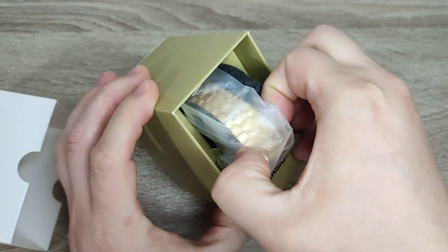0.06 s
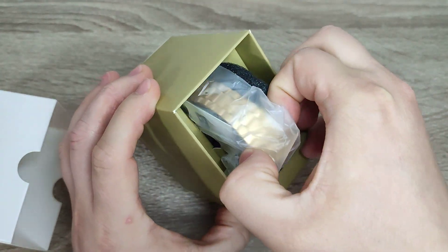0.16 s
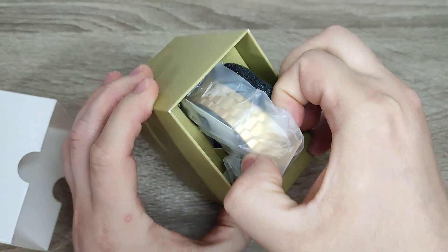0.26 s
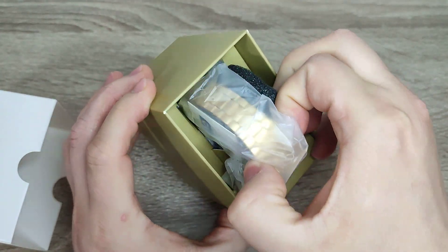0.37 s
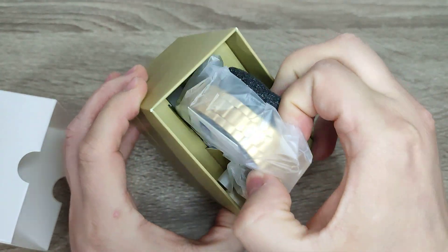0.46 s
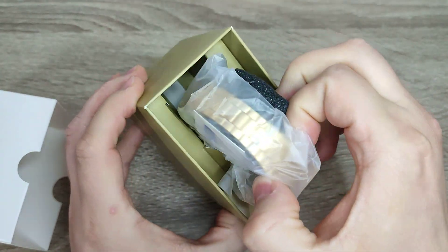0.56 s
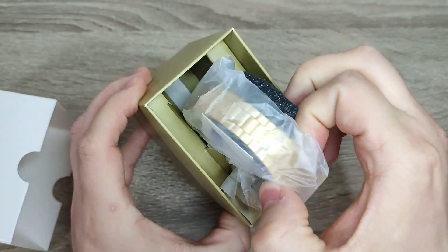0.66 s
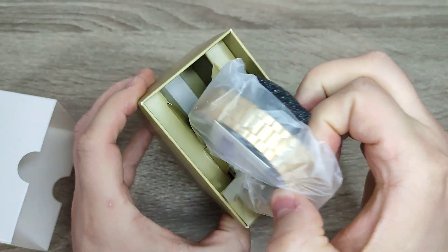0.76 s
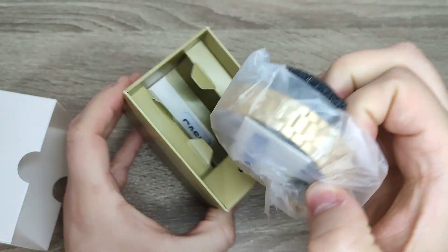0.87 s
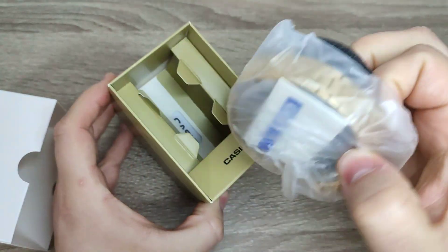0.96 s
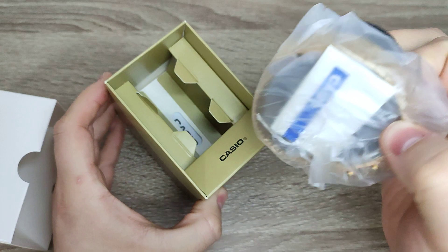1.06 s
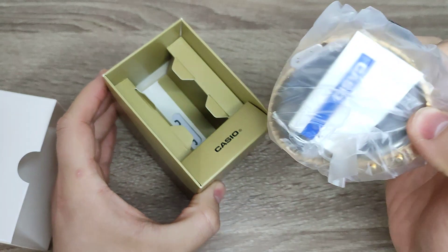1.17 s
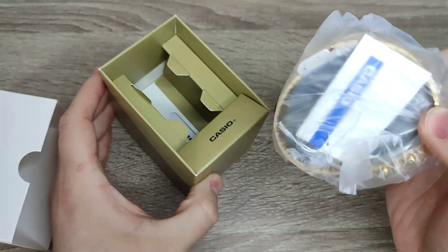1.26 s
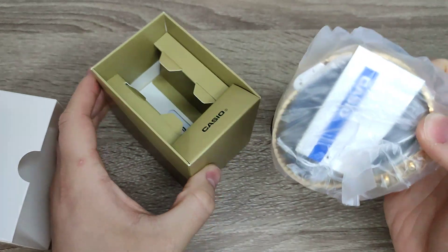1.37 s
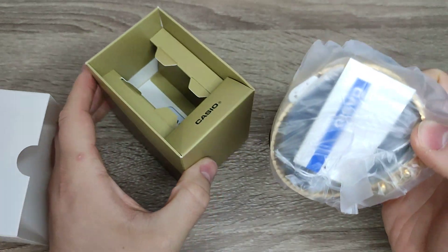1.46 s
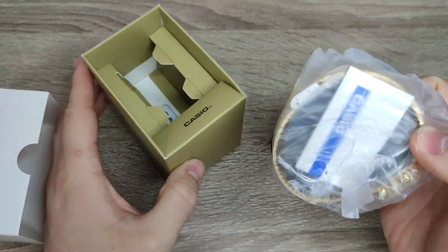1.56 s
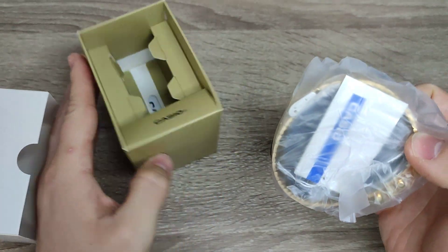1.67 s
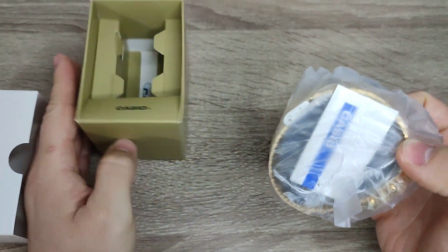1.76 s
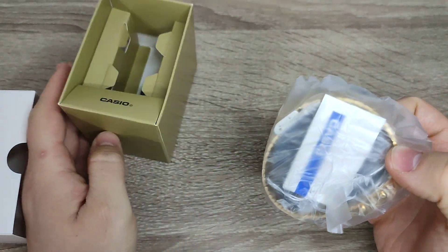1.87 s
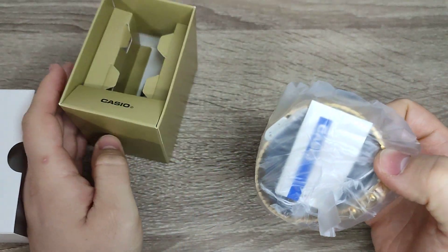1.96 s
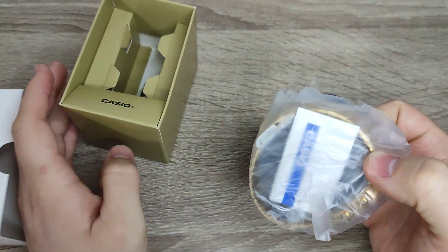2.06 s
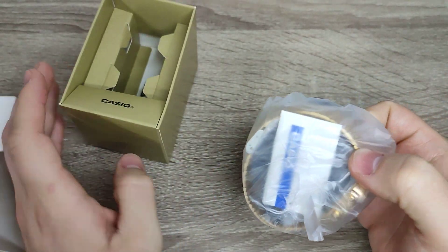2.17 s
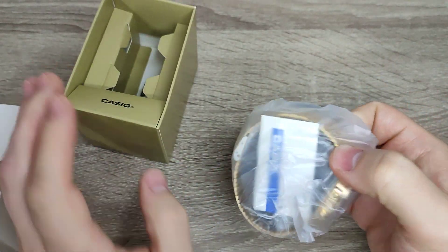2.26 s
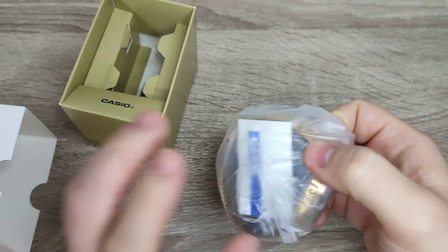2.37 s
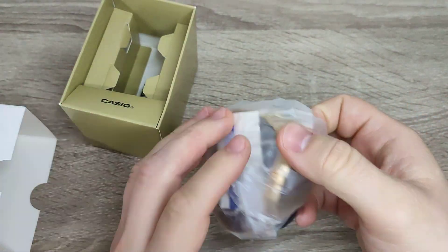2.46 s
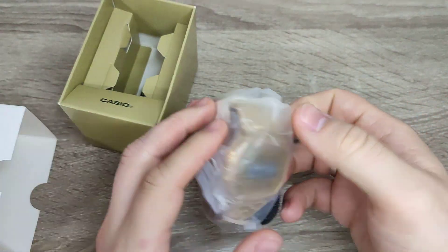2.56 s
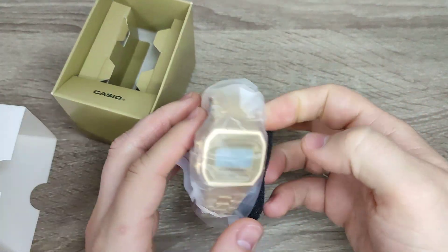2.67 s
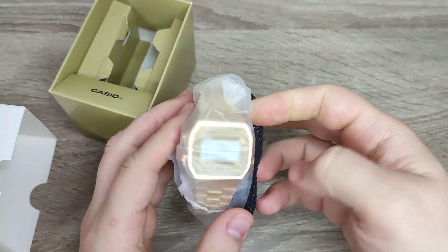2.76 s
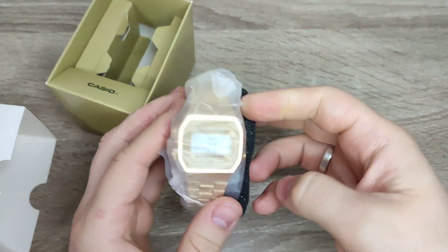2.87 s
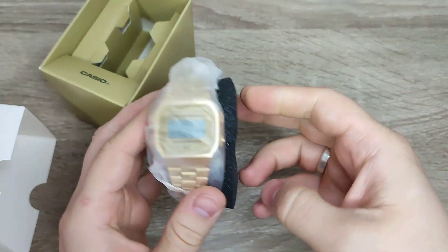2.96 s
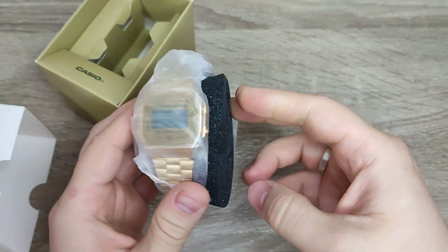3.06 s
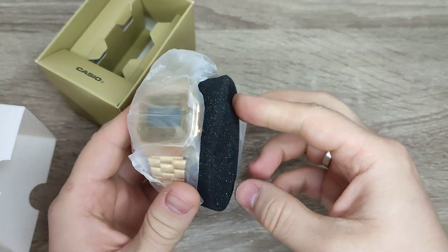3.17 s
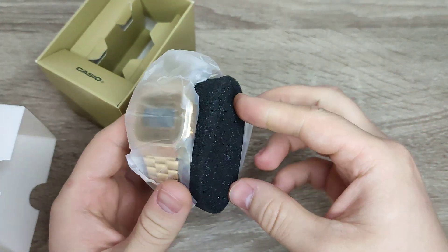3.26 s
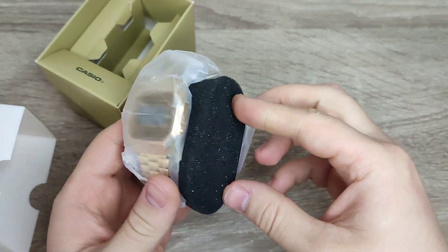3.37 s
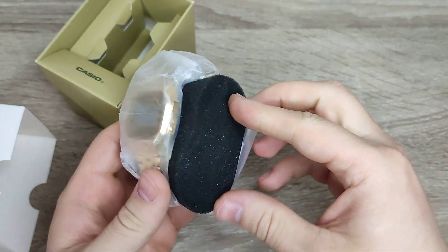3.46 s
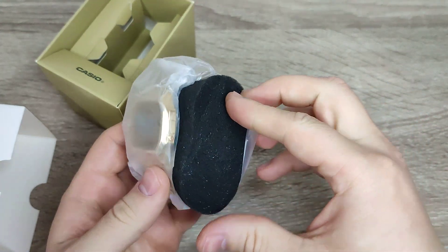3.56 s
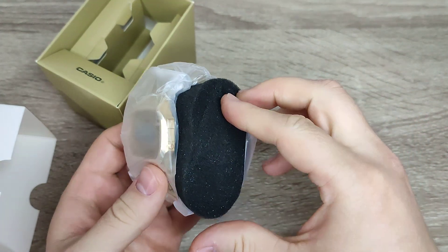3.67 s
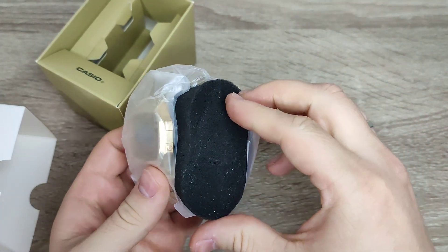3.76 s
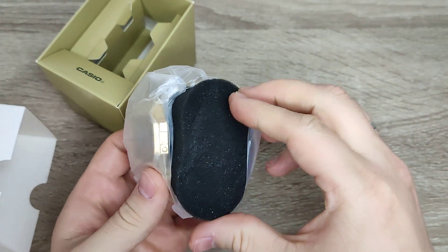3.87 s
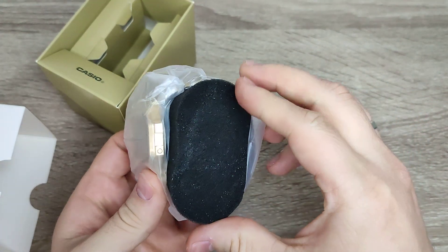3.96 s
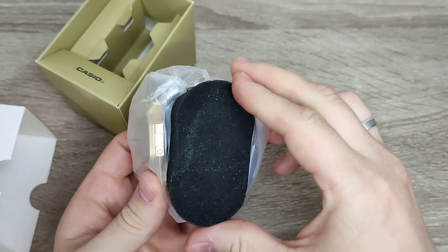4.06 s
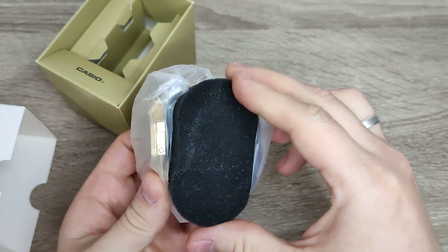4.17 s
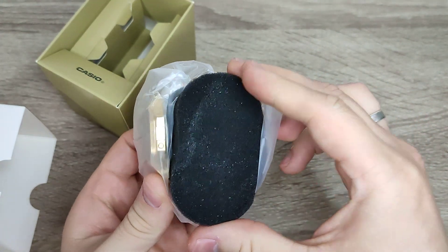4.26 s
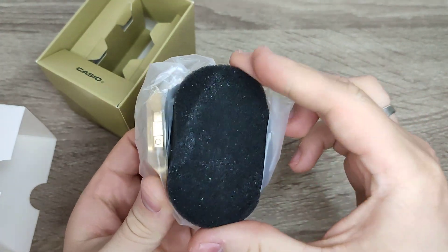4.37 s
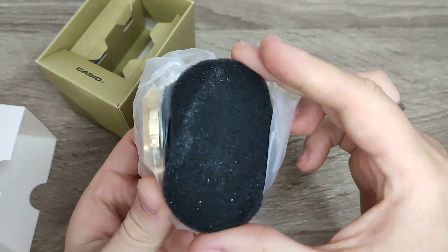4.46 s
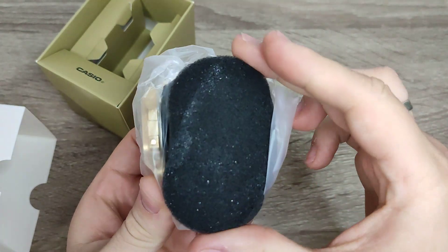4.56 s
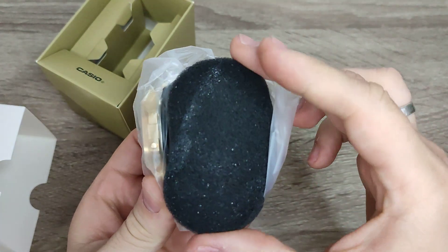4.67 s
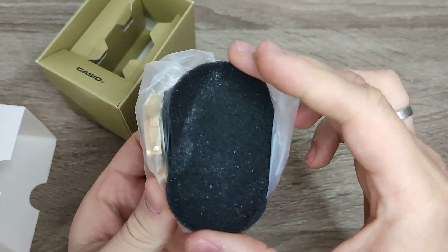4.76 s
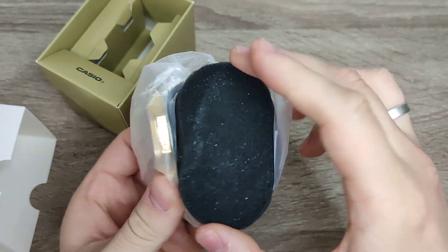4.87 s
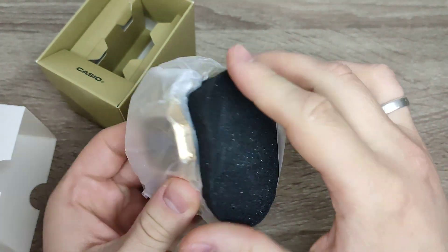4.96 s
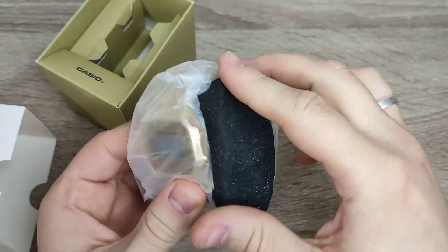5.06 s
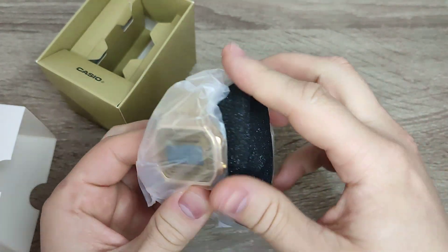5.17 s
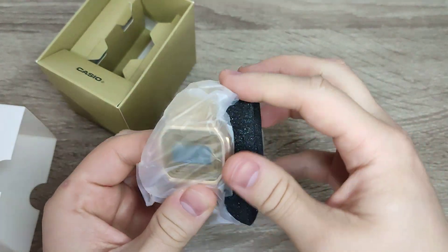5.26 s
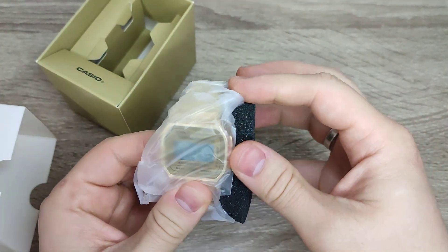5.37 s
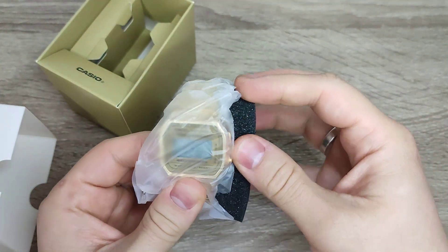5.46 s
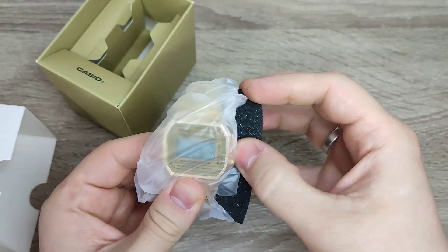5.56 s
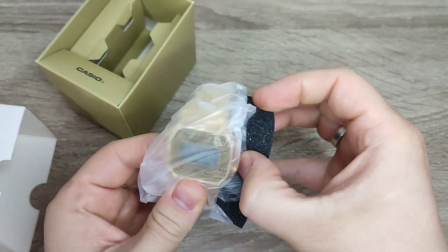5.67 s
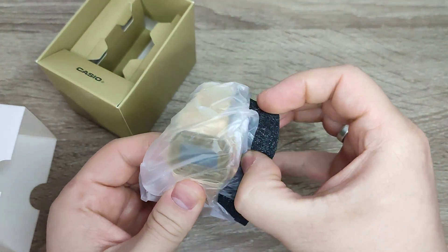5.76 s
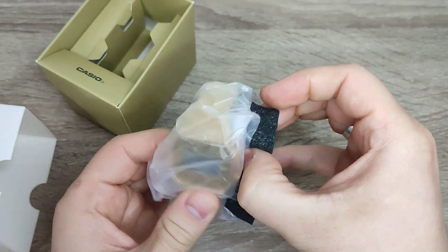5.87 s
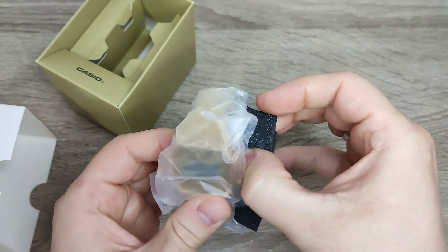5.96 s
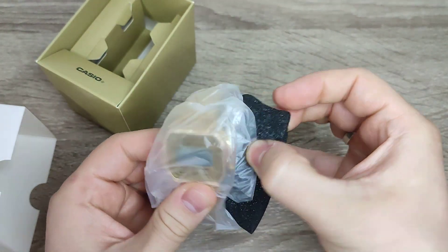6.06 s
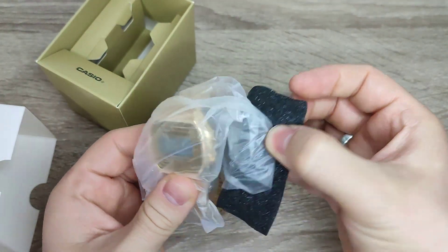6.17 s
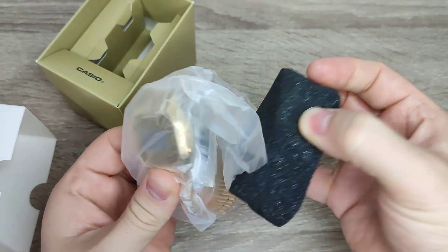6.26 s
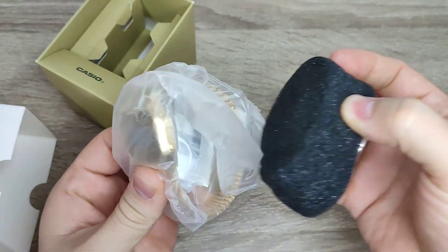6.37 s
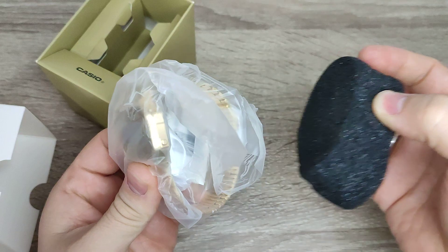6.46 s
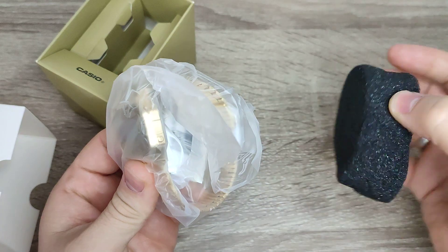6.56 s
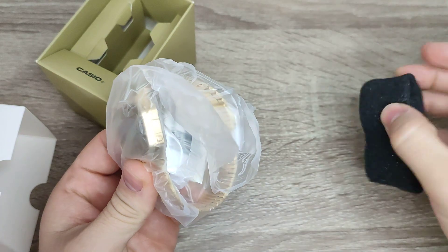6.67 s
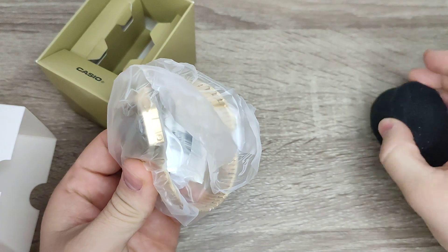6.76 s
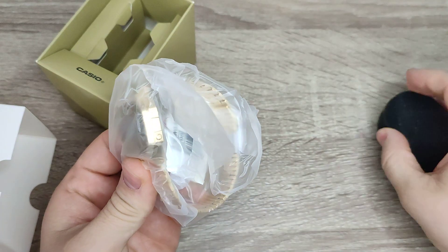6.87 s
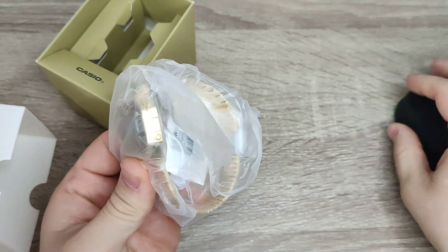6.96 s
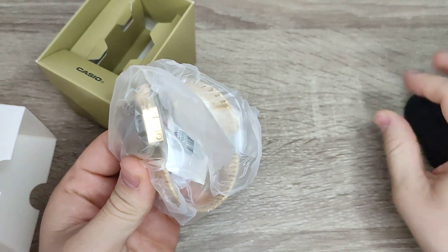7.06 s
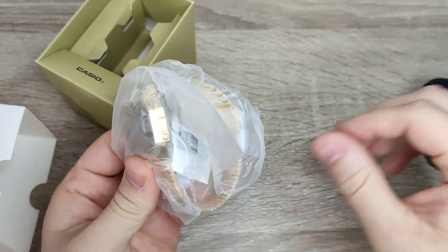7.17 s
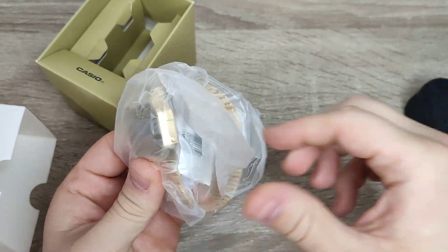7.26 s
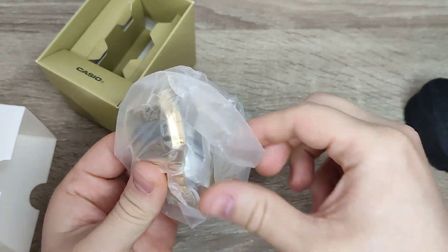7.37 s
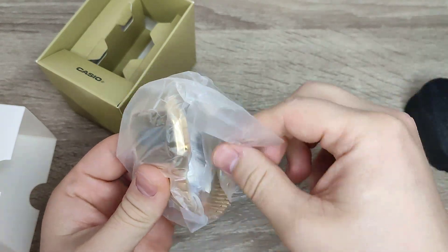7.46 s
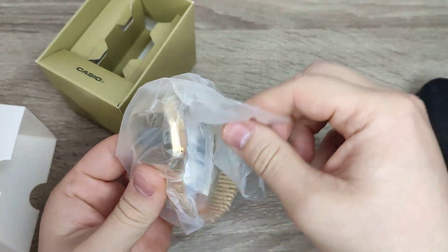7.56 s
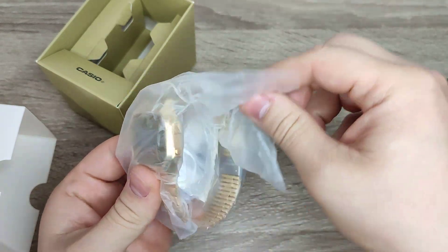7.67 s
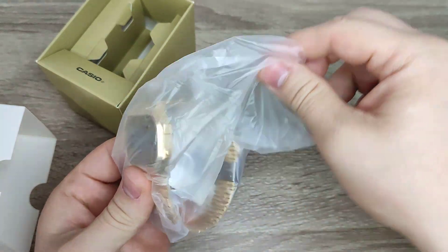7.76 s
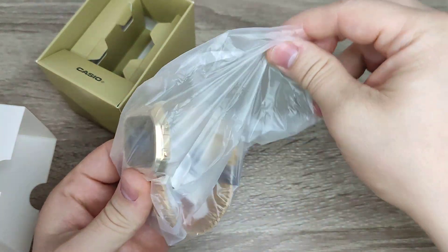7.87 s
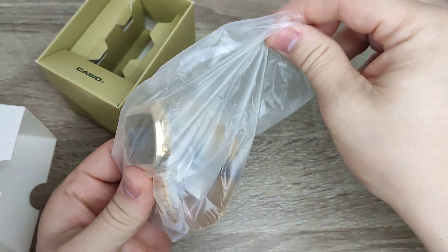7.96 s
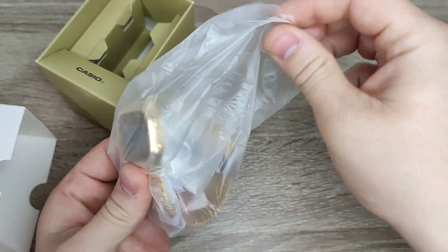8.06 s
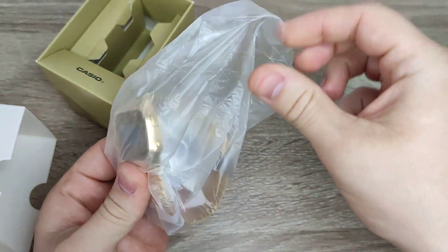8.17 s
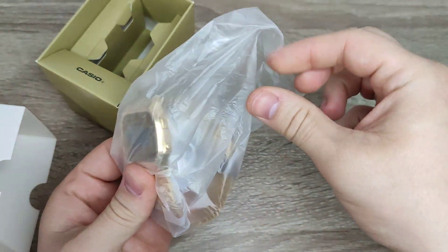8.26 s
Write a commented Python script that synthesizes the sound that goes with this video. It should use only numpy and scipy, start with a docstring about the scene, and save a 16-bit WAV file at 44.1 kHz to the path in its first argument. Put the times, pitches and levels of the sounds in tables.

```python
"""Thin plastic film rubs, crackles and snaps close by, over the faint hum of an appliance in a quiet room.
A wristwatch in a bag is pulled out of a small cardboard box, whose insert snaps back; the box is set down
and pushed aside on a wooden table; a foam cushion is worked out of the strap and the bag is drawn open.
Film, card and wood are noise gated by tiny slips and coloured by spectra, snaps are short noise bursts,
and the box and its insert ring as damped modes."""
import sys
import numpy as np
from scipy import signal
from scipy.fft import rfft, irfft, next_fast_len
from scipy.io import wavfile
from scipy.ndimage import map_coordinates

SR = 44100
rng = np.random.default_rng(int(sys.argv[2]) if len(sys.argv) > 2 else 0)


def master_out(mix):
    """Clip the mix to full scale and print it as 16-bit PCM to the path in sys.argv[1]."""
    frames = np.transpose(np.atleast_2d(mix))
    ceiling = np.clip(frames, -1, 1)
    pcm = np.round(ceiling * 32767).astype(np.int16)
    wavfile.write(sys.argv[1], SR, pcm)


N = 366912

# Hiss of bare film. Each row: frequency in Hz, relative level in dB per Hz.
FILM_SPECTRUM = [(300, -19.5), (1200, -11.5), (2500, -9.5), (3700, -3.5), (5500, -1.5), (7200, 4),
                 (8500, -1), (10000, -5.5), (12000, -3), (14000, -5.5)]
# Lower tone of film backed by foam. Each row: frequency in Hz, relative level in dB per Hz.
BODY_SPECTRUM = [(150, -31), (400, -9), (580, -15), (800, -9.5), (1050, -3.5), (1350, -1), (1600, -6),
                 (1950, -1), (2500, -4.5), (4000, -8.5), (9000, -56)]
TOP_HZ = 14400  # upper band limit
ORDINARY_RUB_DB = -52  # film level that slip rate and small snaps are scaled against


def amp(db):
    """Decibels to gain."""
    return 10 ** (np.asarray(db) / 20)


def unit(x):
    """Scale to rms 1."""
    return x / np.sqrt(np.mean(x ** 2) + 1e-20)


def along(points, hz):
    """Read (Hz, value) points on a log frequency axis."""
    f, v = np.transpose(points)
    return np.interp(np.log(hz + 1), np.log(f + 1), v)


def wobble(rate):
    """A smooth random curve with this many knots a second."""
    knots = rng.standard_normal(int(N * rate / SR) + 4)
    return map_coordinates(knots, [np.arange(N) * rate / SR])


def fade(t, t60):
    """A decay of 60 dB in t60 seconds."""
    return np.exp(-np.log(1000) * t / t60)


def add(track, s, sound):
    """Mix a sound into a track at time s in seconds."""
    start = max(round(s * SR), 0)
    part = track[..., start:start + sound.shape[-1]]
    part += sound[..., :part.shape[-1]]


def filtered(x, response):
    """Multiply the spectrum of x by a complex response of frequency."""
    m = next_fast_len(N + SR // 2)
    return irfft(rfft(x, m) * response(np.fft.rfftfreq(m, 1 / SR)), m)[..., :N]


def coloured(x, spectrum, size=2048):
    """Pass x through a minimum-phase filter of unit energy with this spectrum."""
    cepstrum = irfft(np.log(amp(along(spectrum, np.fft.rfftfreq(size, 1 / SR)))))
    # folding the cepstrum forward makes the filter causal
    cepstrum[1:size // 2] *= 2
    cepstrum[size // 2 + 1:] = 0
    kernel = irfft(np.exp(rfft(cepstrum)))
    return signal.fftconvolve(x, kernel[None] / np.linalg.norm(kernel), axes=1)[:, :N]


def stereo(pair):
    """Two unrelated signals become left and right, alike in the bass and wide in the treble."""
    # Likeness of the channels. Each row: frequency in Hz, left-right correlation from 0 to 1.
    likeness = [(100, 0.86), (500, 0.73), (1200, 0.88), (2500, 0.38), (7000, 0.11), (14000, 0.088)]

    def mid_side_gains(hz):
        turn = np.arccos(np.clip(along(likeness, hz), -1, 1)) / 2
        return np.array([np.cos(turn), np.sin(turn)])

    mid, side = filtered(pair, mid_side_gains)
    return np.array([mid + side, mid - side])


def burst(t, rise, t60):
    """Two channels of noise that jump up and die away."""
    return rng.standard_normal((2, len(t))) * (1 - np.exp(-t / rise)) * fade(t, t60)


def ring(modes, t):
    """Sum damped modes, each struck with a new strength and polarity every time."""
    total = np.zeros(len(t))
    for hz, db, t60 in modes:
        strength = amp(db + rng.normal(0, 0.8)) * rng.choice([-1, 1])
        total += strength * np.sin(2 * np.pi * hz * t) * fade(t, t60)
    return total


def slips(rate, spread_db, t60):
    """Power envelope, mean about 1, of tiny slips at random moments: many weak, few strong."""
    sizes = amp(spread_db * np.minimum(rng.standard_exponential(N), 2.5)) ** 2
    happens = rng.random(N) < rate / SR
    power = happens * sizes / np.mean(sizes) * SR / rate
    life = fade(np.arange(SR // 20) / SR, t60) ** 2
    life = np.convolve(life, np.hanning(SR // 1000))  # soften each onset over 1 ms
    return np.abs(signal.fftconvolve(power, life / np.sum(life))[:N])


def grains(power, smooth=0.13):
    """Noise that comes in crackles over a little plain sliding."""
    share = np.clip(smooth, 0, 1)
    return np.sqrt(share + (1 - share) * power) * rng.standard_normal((2, N))


def gesture(rows):
    """Power of one long movement, silent before and after."""
    s, db = np.transpose(rows)
    return amp(np.interp(np.arange(N) / SR, s, db, left=-np.inf, right=-np.inf)) ** 2


def strokes(rows, attack, release):
    """Power of short movements (start, length, dB): each rises, holds and dies away."""
    power, t = np.zeros(N), np.arange(SR) / SR
    for s, length, db in rows:
        rise = np.minimum(t / attack, 1)
        decay = fade(np.maximum(t - length, 0), release)
        add(power, s, (amp(db) * rise * decay) ** 2)
    return power


def background(air_db=-59):
    """A distant motor hums as slightly unsteady partials over the room air, a shaped noise."""
    # Partials of the motor. Each row: frequency in Hz, average rms level in dB.
    hum_partials = [(37.7, -66.5), (75.4, -70), (102.3, -93), (150.7, -68.5), (226.1, -69.5)]
    # Tone of the room air. Each row: frequency in Hz, relative level in dB per Hz.
    air_spectrum = [(12, -54.5), (20, 5), (54, 3), (115, -2.5), (229, 3.5), (302, 1), (357, -10.5),
                    (774, -14.5), (841, -43), (994, -22), (3180, -26), (6910, -24.5), (9900, -62),
                    (13800, -25), (15000, -47)]
    t = np.arange(N) / SR
    hum = np.zeros(N)
    for hz, db in hum_partials:
        level = amp(db + wobble(4.7))
        hum += level * np.sin(2 * np.pi * hz * t + 0.45 * wobble(2.08))
    air = unit(filtered(rng.standard_normal((2, N)), lambda hz: amp(along(air_spectrum, hz))))
    return np.sqrt(2) * hum + amp(air_db) * stereo(air)


def room(x):
    """Each frequency of the room's answer, a tail of noise 5 ms behind, dies at its own speed."""
    # Reverberation. Each row: frequency in Hz, time to die by 60 dB in seconds.
    room_decay = [(200, 0.26), (1500, 0.29), (6000, 0.16), (14000, 0.05)]
    hz, t, z = signal.stft(rng.standard_normal((2, SR // 2)), SR, nperseg=256)
    tail = signal.istft(z * fade(t, along(room_decay, hz)[:, None]), SR, nperseg=256)[1]
    delayed = np.pad(x, ((0, 0), (SR // 200, 0)))
    return signal.fftconvolve(delayed, tail / np.linalg.norm(tail[0]), axes=1)[:, :N]


def sliding():
    """The box swishes over the wood with each push, a grainy friction noise."""
    # Pushes over the table. Each row: start in seconds, length in seconds, level in dB.
    push_moves = [(1.41, 0.038, -65), (1.635, 0.25, -60.5), (1.95, 0.069, -65), (2.1, .19, -63)]
    # Tone of the box on wood. Each row: frequency in Hz, relative level in dB per Hz.
    wood_spectrum = [(200, -11), (500, -4), (850, -4.5), (1130, 3.5), (1450, -10), (2300, -10), (5000, -24),
                     (10000, -25)]
    push = np.sqrt(strokes(push_moves, attack=.025, release=.25))
    grit = grains(slips(1100, spread_db=6, t60=.036))
    return coloured(push * grit, wood_spectrum)


def box(ring_db=-4.0, puff_db=-4):
    """The box, let go by the insert or touching the table, thumps or knocks: damped modes and a puff of noise."""
    # Knocks of the box: the insert letting go, then touches on the table.
    # Each row: start in seconds, base thump in dB, wall knock in dB before trims.
    box_knocks = [(0.904, -63, -38.5), (1.422, -38, -49), (1.457, -57, -46.5), (2.2947, -59, -33.5),
                  (2.299, -65, -44)]
    # Modes of the base. Each row: frequency in Hz, relative level in dB, time to die by 60 dB in seconds.
    base_modes = [(144.5, 0, 0.23), (268, -8, 0.11), (330, -2, 0.047)]
    # Modes of the walls. Each row: frequency in Hz, relative level in dB, time to die by 60 dB in seconds.
    wall_modes = [(335, -2.5, 0.034), (420, -4.5, 0.095), (562, -11, 0.045), (741, -7.5, 0.091),
                  (800, 2.5, 0.035), (1000, -23, 0.06)]
    # Tone of the air in the knocked box. Each row: frequency in Hz, relative level in dB per Hz.
    hollow_spectrum = [(120, -15), (340, 0), (560, -3.5), (790, 1.5), (1100, -15), (3000, -42)]
    knocks, puffs, t = np.zeros((2, N)), np.zeros((2, N)), np.arange(SR // 3) / SR
    for s, thump_db, wall_db in box_knocks:
        thump = amp(thump_db) * ring(base_modes, t)
        knock = amp(wall_db + ring_db) * ring(wall_modes, t)
        add(knocks, s, (thump + knock) * (1 - np.exp(-t / 0.00072)))
        add(puffs, s, amp(wall_db + puff_db) * burst(t, rise=.0005, t60=0.048))
    return knocks + stereo(coloured(puffs, hollow_spectrum))


def insert(ring_db=-27, crack_db=-15):
    """The cardboard insert lets go of the watch, slaps back as noise and shivers to rest in damped modes."""
    # Modes of the insert. Each row: frequency in Hz, relative level in dB, time to die by 60 dB in seconds.
    insert_modes = [(222, -17, 0.072), (330, -23, 0.076), (571, -11.5, 0.12), (978, 1, 0.038),
                    (1190, 0.5, 0.024), (1750, 5, 0.046), (1910, -12, 0.033), (3050, 5, 0.06)]
    # Tone of the slap. Each row: frequency in Hz, relative level in dB per Hz.
    slap_spectrum = [(150, -6.5), (300, 7.5), (500, -12), (1000, 5), (1800, -2), (2400, -2), (3100, 1),
                     (4200, -0.5), (7500, 2.5), (10500, -10), (14000, -1)]
    release_s = .9005
    slap, t = np.zeros((2, N)), np.arange(SR // 4) / SR
    hit = burst(t, rise=0.00017, t60=0.033) + amp(-11) * burst(t, rise=0.0041, t60=0.076)
    add(slap, release_s, amp(crack_db) * hit)
    slap = stereo(coloured(slap, slap_spectrum))
    add(slap, release_s, amp(ring_db) * ring(insert_modes, t))
    return slap


def flapping():
    """Pulled open, the whole sheet buckles with low, soft pops: dense slips of dark noise."""
    # Flapping of the stretched bag. Each row: time in seconds, level in dB.
    flap_level = [(7.4, -73.5), (7.53, -54), (7.6, -68), (7.75, -55), (7.86, -48.5), (7.93, -47),
                  (8.02, -62), (8.12, -62)]
    # Tone of the whole sheet. Each row: frequency in Hz, relative level in dB per Hz.
    sheet_spectrum = [(80, -31), (200, -10), (350, -0.5), (600, -13), (780, -2.5), (1200, -14.5),
                      (4000, -40)]
    s, db = np.transpose(flap_level)
    level_db = np.interp(np.arange(N) / SR, s, db)
    pops = np.sqrt(slips(np.full(N, 120), spread_db=1, t60=0.023)) * rng.standard_normal((2, N))
    return coloured(amp(level_db) * pops, sheet_spectrum)


def handling():
    """Power of the film's hiss and of its rub on foam and on cardboard, from all movements of the hands."""
    # Drawing the watch out of the cardboard. Each row: time in seconds, rub level in dB.
    pull_out = [(0, -49.5), (0.05, -47.5), (0.13, -55), (0.3, -52), (0.41, -56), (0.46, -48), (0.59, -45),
                (0.77, -53), (0.83, -48.5), (0.89, -37), (0.93, -54), (1.04, -62.5)]
    # Turning the foam cushion in the strap. Each row: time in seconds, rub level in dB.
    turn_cushion = [(3.51, -64.5), (3.59, -51), (3.71, -44.5), (3.83, -57), (3.98, -52.5), (4.15, -65),
                    (4.27, -52.5), (4.43, -55), (4.55, -65.5)]
    # Working the cushion free. Each row: time in seconds, rub level in dB.
    free_cushion = [(4.83, -61.5), (4.9, -52.5), (5.01, -44.5), (5.15, -40), (5.17, -49.5), (5.38, -37),
                    (5.49, -45.5), (5.68, -43.5), (5.76, -42.5), (5.9, -47), (5.94, -38.5), (6.03, -50.5),
                    (6.11, -36.5), (6.28, -42), (6.32, -44.5), (6.49, -49.5), (6.51, -62), (6.62, -72)]
    # Drawing the bag open. Each row: time in seconds, rub level in dB.
    open_bag = [(7.34, -77), (7.38, -43.5), (7.45, -50.5), (7.65, -41), (7.74, -39.5), (7.84, -31),
                (8.02, -39.0), (8.04, -44), (8.15, -39.5), (8.2, -53.5), (8.32, -54)]
    # Short rubs of the film apart from the long movements, most of them single finger strokes. Each row: start
    # in seconds, length in seconds, film hiss in dB, low rub in dB.
    short_strokes = np.array([(0.83, 0.043, -40.5, -46), (1.038, 0.052, -55, -67),
                               (1.197, 0.098, -62.5, -70), (1.305, 0.024, -60, -61),
                               (1.382, 0.076, -57.5, -59), (1.62, 0.27, -69, -76),
                               (2.25, 0.099, -62.5, -67), (2.486, 0.2, -54, -60),
                               (2.537, 0.042, -46.5, -49.5), (2.748, 0.053, -50.5, -60.5),
                               (2.86, 0.035, -50.5, -60), (2.92, 0.17, -60, -65),
                               (3.159, 0.027, -53.5, -62), (3.236, 0.02, -58, -65),
                               (3.327, 0.031, -42.5, -49), (3.76, 0.0356, -44, -55),
                               (4.33, 0.067, -47.5, -55), (4.572, 0.11, -59.5, -66.5),
                               (4.694, 0.1, -53.5, -55.5), (5.112, 0.048, -39.5, -43.5),
                               (5.938, 0.058, -37.5, -50), (6.09, 0.14, -42, -45), (6.45, 0.042, -52, -48),
                               (6.66, 0.039, -59, -70), (6.789, 0.052, -56, -76), (6.886, 0.12, -60, -72),
                               (7.034, 0.053, -47, -60), (7.104, 0.11, -60, -81),
                               (7.374, 0.045, -47.5, -51)])
    attack, release = .012, 0.14  # rise time in seconds; seconds to die by 60 dB
    foam_under_db, bare_under_db, card_under_db = -8, -9.5, 0.5  # low rub on foam, bare watch, card
    holding_db = -76  # the film is never quite still in the hand

    pull = gesture(pull_out)
    cushion = gesture(turn_cushion) + gesture(free_cushion)
    bag = gesture(open_bag)
    stroke_film = strokes(short_strokes[:, [0, 1, 2]], attack, release)
    stroke_foam = strokes(short_strokes[:, [0, 1, 3]], attack, release)
    film = np.maximum(pull + cushion + bag, stroke_film) + amp(holding_db) ** 2
    low_rub = amp(foam_under_db) ** 2 * cushion + amp(bare_under_db) ** 2 * bag
    foam = np.maximum(low_rub, stroke_foam) + amp(holding_db) ** 2
    return film, foam, amp(card_under_db) ** 2 * pull


def patchy(x, depth_db, width_hz, size=512):
    """The creases keep changing shape: resonances come and go across the spectrum."""
    z = signal.stft(x, nperseg=size)[2]
    rows, frames = z.shape[1:]
    place = np.arange(rows) * SR / size / max(width_hz, 100)
    grid = np.meshgrid(place, np.arange(frames) / 2, indexing="ij")
    field = map_coordinates(rng.standard_normal((rows, frames)), grid, order=1)
    return signal.istft(z * unit(amp(depth_db * field)), nperseg=size)[1][:, :N]


def rubbing(film_power, foam_power, card_power, hiss_db=0.04, foam_db=0.32, grip_db=1.5):
    """The film sticks and slips; harder rubbing packs single ticks into a hiss."""
    # Tone of rubbed cardboard. Each row: frequency in Hz, relative level in dB per Hz.
    card_spectrum = [(150, -18), (320, -10.5), (620, -11), (970, 0), (1250, -5.5), (1770, 0), (2130, -3.5),
                     (2850, -0.5), (4300, -5.5), (9000, -15)]
    slips_per_s, slip_growth = 330, 1  # rate at an ordinary rub; how it follows the rubbing
    effort = np.sqrt(film_power) / amp(ORDINARY_RUB_DB)
    rate = np.clip(slips_per_s * effort ** slip_growth, 90, 4000)
    crackle = slips(rate, spread_db=6.5, t60=.014)
    drag = (crackle + slips(rate * .6, spread_db=6, t60=.018)) / 2
    grip = amp(grip_db * wobble(40))  # the fingers keep catching
    film = amp(hiss_db) * np.sqrt(film_power) * grip * grains(crackle, smooth=.13)
    foam = amp(foam_db) * np.sqrt(foam_power) * grip * grains(drag, smooth=.15)
    card = np.sqrt(card_power) * grains(slips(1100, spread_db=4.5, t60=0.034))
    hiss = coloured(patchy(film, depth_db=3.5, width_hz=679), FILM_SPECTRUM)
    low_rub = coloured(patchy(foam, depth_db=5, width_hz=213.0), BODY_SPECTRUM)
    return hiss + low_rub + coloured(card, card_spectrum)


def small_snaps(film_power, count=400):
    """Lesser creases pop at random, louder under harder rubbing and rarer under a light touch."""
    snaps_per_s, snap_db, scatter_db = 25, -47.5, 1  # at an ordinary rub
    growth = 0.32  # dB of snap for each dB of rubbing
    body_under_db, body_scatter_db = -8, 4.5  # body against crack
    when, chance = rng.random((count, 2)).T
    size, depth = rng.standard_normal((count, 2)).T
    effort_db = 10 * np.log10(film_power[(when * N).astype(int)]) - ORDINARY_RUB_DB
    rate = snaps_per_s * np.minimum(amp(.2 * effort_db), 1)
    crack_db = snap_db + growth * effort_db + scatter_db * size
    body_db = crack_db + body_under_db + body_scatter_db * depth
    rows = np.column_stack([when * N / SR, crack_db, body_db])
    return rows[chance < rate * N / SR / count]


def snapping(film_power, film_db=1, body_db=-1):
    """A crease gives a little, pops with the ring of its own facet, then settles; one box click is made alike."""
    # The loudest snaps of film, and at 2.298 the click of the box's knock.
    # Each row: time in seconds, crack in dB, body in dB, both before a trim.
    loud_snaps = [(0.038, -37, -40.5), (0.8014, -39.5, -47), (1.0142, -49.5, -53), (1.2541, -45, -64),
                  (1.318, -47.5, -57), (1.3668, -44.5, -47), (1.3911, -42.5, -72), (1.48, -43, -54),
                  (1.5565, -59, -50.5), (1.7314, -51.5, -56), (1.9705, -41.5, -46), (2.298, -44, -56),
                  (2.6131, -44.5, -50), (2.678, -40.5, -62), (2.7168, -42.5, -49), (2.8639, -45.5, -60),
                  (2.9413, -44, -54), (2.9654, -38.5, -50), (3.196, -52, -52), (3.334, -43, -56),
                  (3.3526, -37, -41), (3.5359, -47, -49), (3.5951, -40, -46), (3.783, -49, -45.5),
                  (3.7948, -39.5, -58), (3.8423, -46, -44.5), (3.8807, -38.5, -63), (3.9267, -41.0, -68),
                  (3.938, -47.5, -45.5), (4.0609, -43, -67), (4.1129, -42.5, -47.5), (4.1863, -46, -43),
                  (4.2632, -38.5, -43), (4.4228, -61, -47), (4.4571, -37, -47), (4.7086, -39, -65),
                  (4.8582, -45.5, -72), (4.9045, -42, -58), (5.0105, -38.0, -40), (5.265, -41, -44),
                  (5.295, -42, -47), (5.3404, -35.5, -58), (5.4553, -40, -41), (5.5927, -42, -44.5),
                  (5.6339, -40, -50), (5.9389, -30, -67), (6.2898, -31.0, -43), (6.3858, -36, -49),
                  (6.4018, -43.5, -41.5), (6.4877, -42.5, -46), (6.6629, -49.5, -50), (6.695, -47.5, -53),
                  (6.9592, -39.5, -52), (7.0259, -40.5, -57), (7.1018, -41.5, -54), (7.125, -40, -51),
                  (7.2039, -42, -55), (7.372, -45, -49.5), (7.7093, -29.5, -59), (7.7323, -30, -46),
                  (7.8032, -28.0, -63), (7.9937, -32.5, -39), (8.1462, -41, -59)]
    pops, t = np.zeros((2, N)), np.arange(SR // 20) / SR
    hz = np.fft.rfftfreq(len(t), 1 / SR)
    knots = np.geomspace(500, TOP_HZ, 28)
    lead = SR // 400  # the soft give starts 2.5 ms before the pop
    for s, crack_db, thud_db in [*loud_snaps, *small_snaps(film_power)]:
        facet = amp(4 * np.interp(hz, knots, rng.standard_normal(len(knots))))
        pop = burst(t, rise=.0005, t60=.014)
        settling = amp(-19) * burst(t, rise=.002, t60=.04)
        give = amp(-18) * burst(t, rise=.004, t60=.015)
        pop = np.roll(pop + settling, lead, axis=1) + give
        for spectrum, db in ((FILM_SPECTRUM, crack_db + film_db), (BODY_SPECTRUM, thud_db + body_db)):
            part = unit(irfft(rfft(pop) * facet * amp(along(spectrum, hz)), len(t)))
            add(pops, s - lead / SR, amp(db) * part / np.sqrt(10))  # keeps a tenth of the energy
    return pops


def scene(lead=0.00012, room_db=-15):
    """Near sounds reach the left side lead seconds early, sit half a dB higher on the right, and stir the room."""
    air, knocks = background(), insert() + box()
    film, foam, card = handling()
    near = stereo(rubbing(film, foam, card) + sliding() + flapping() + snapping(film)) + knocks
    sides = np.array([[1], [-1]])
    near = filtered(near, lambda hz: np.exp(1j * np.pi * hz * lead * sides))
    return (near + amp(room_db) * room(near)) * amp([[-.25], [.25]]) + air


def record(dry):
    """A very steep low-pass removes what lies above the band limit."""
    return filtered(dry, lambda hz: 1 / np.sqrt(1 + (hz / TOP_HZ) ** 190))


dry = scene()
out = record(dry)
master_out(out)
```